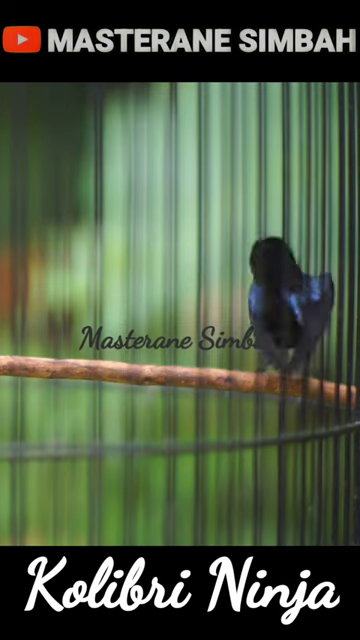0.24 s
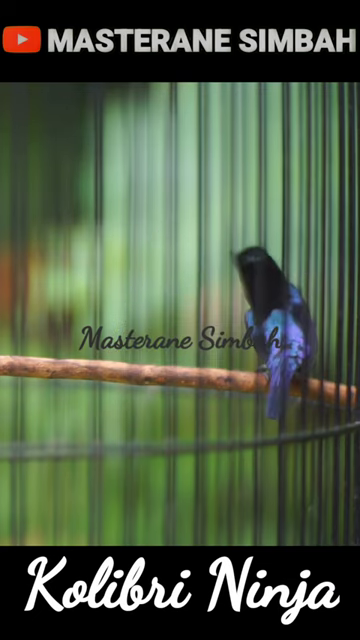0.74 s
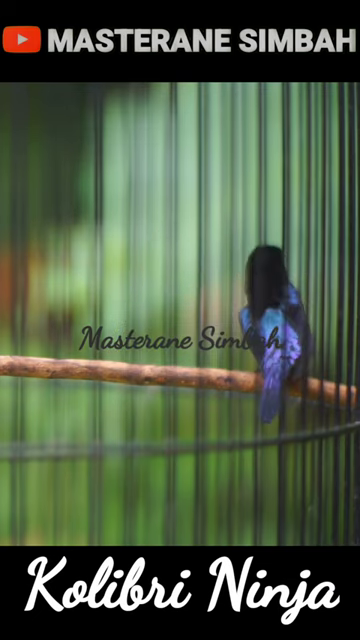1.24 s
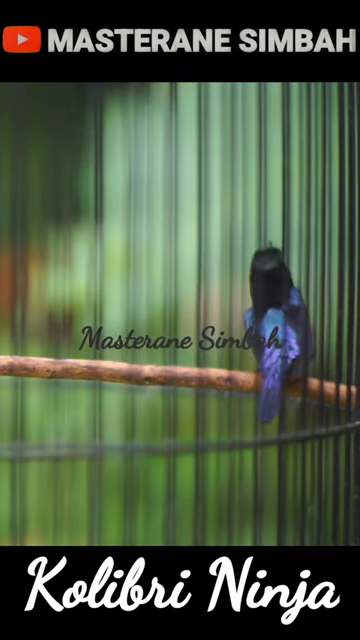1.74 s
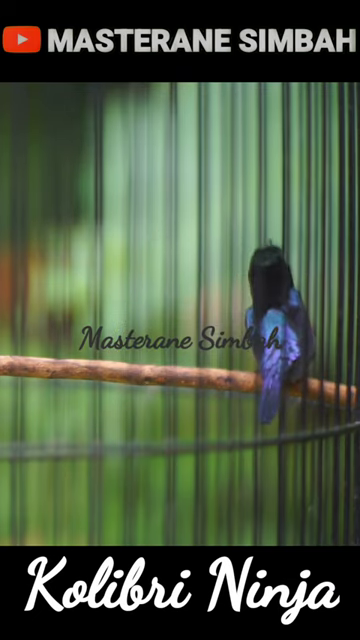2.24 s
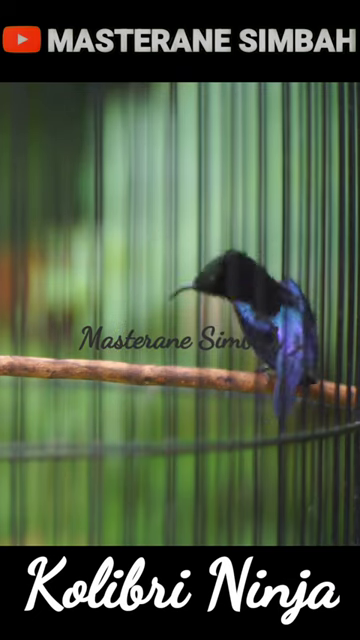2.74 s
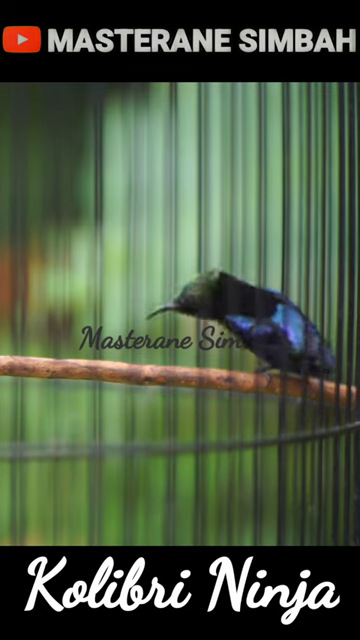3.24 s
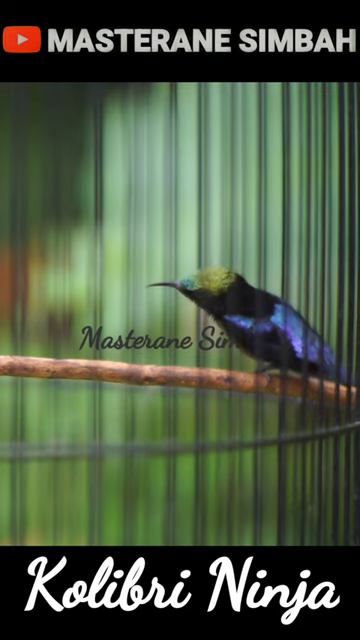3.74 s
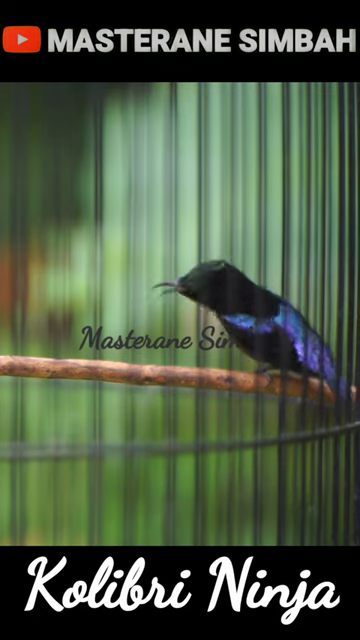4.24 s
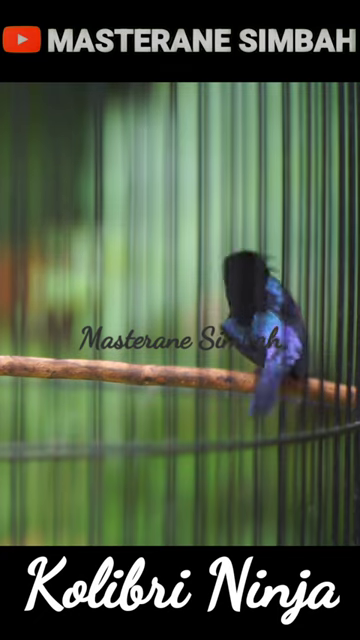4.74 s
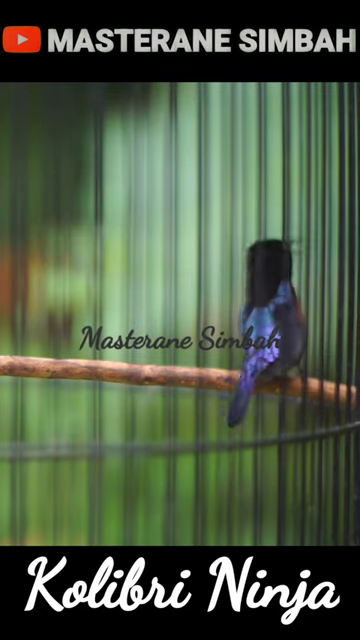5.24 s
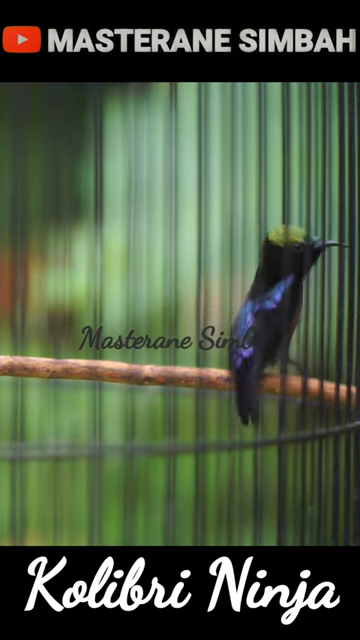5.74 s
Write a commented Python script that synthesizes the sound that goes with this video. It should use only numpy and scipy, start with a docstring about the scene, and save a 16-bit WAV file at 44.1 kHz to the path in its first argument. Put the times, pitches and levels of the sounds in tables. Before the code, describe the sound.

A small caged songbird sings close to a stereo microphone, leaning left, in a hard-surfaced space with a short bright tail. Soft hiss, barely audible hums and low rumble lie underneath. Three clipped, slightly buzzy two-toned chirps, around 5 kHz, come at 0.15, 0.4 and 0.6 s, over thin high distant birds. From about 0.75 to 2.1 s a fast trill of fifteen near-identical whistles runs at roughly eleven per second, each climbing, flicking upward and cutting off, louder than the chirps, while the hiss thickens. Single chirps return at 2.4, 3.1, 3.5, 4.1, 4.3, 4.8, 5.3 and 5.7 s. Between them are faint airy puffs near 2.6 and 3.9 s, a tiny dry tick at 3.2 s and a stronger puff at 4.35 s. Very faint far calls come near 4.6 s, and rumble swells around 5.4 s. A clearer distant whistle at 5.55 s and a dull low puff at 5.7 s accompany the last chirp.

```python
"""A small caged bird sings near a two-port microphone in a hard room, over soft hiss, hums and low rumble.
Three two-voiced chirps come first, over thin far birds; from 0.75 s to 2.1 s a fast trill of whistles
follows, with louder hiss. Then single chirps return among short noise bursts, soft puffs and one very brief
tick, with farther calls from 4.6 s and the rumble highest near 5.4 s. Gliding phases and breath noise form
the bird, wavering sines the far birds and hums, shaped noise the bursts and hiss, echoes and a tail the room."""
import sys
import numpy as np
from scipy import signal
from scipy.fft import rfft, irfft
from scipy.io import wavfile
from scipy.ndimage import uniform_filter1d

SR = 44100
rng = np.random.default_rng(int(sys.argv[2]) if len(sys.argv) > 2 else 0)


def wrap_up_sound(samples):
    """Save the sound to the file named by the first command line argument, as 16-bit audio."""
    columns = np.atleast_2d(samples).T
    # keep every value between -1 and 1, then stretch to whole-number steps
    tamed = np.clip(columns, -1, 1)
    steps = np.round(tamed * 32767).astype(np.int16)
    wavfile.write(sys.argv[1], SR, steps)


N = 263277

# Spectrum of the hiss. Each row: frequency in Hz, relative density in dB per Hz.
HISS_SPECTRUM = [(15, -91), (25, -43), (79, -15), (114, -12), (317, -8), (360, -9.5), (454, -7.5),
                 (1270, -7), (2880, -8), (5900, -7), (8670, -11.5), (10600, -9), (11500, -9),
                 (15000, -65.5), (22000, -120)]
# Overall level of the hiss, louder during the trill. Each row: time in seconds, level in dB.
HISS_LEVEL = [(0, -56), (.65, -59.5), (0.898, -55), (2.02, -58), (2.252, -64), (3.5, -61.5), (4.25, -58.5),
              (5.97, -58.5)]
# Tilt of the hiss toward low frequencies, about 300 Hz down. Each row: time in seconds, relative gain in dB.
RUMBLE_GAIN = [(0, -2.5), (1.3, -3), (2.3, 3), (3.0, 4.5), (4.6, 4), (5.4, 11.5), (5.97, -1.5)]
# Likeness of the two hiss channels. Each row: frequency in Hz, left-right correlation from -1 to 1.
HISS_CORRELATION = [(60, 0.77), (170, 0.3), (490, -0.12), (1400, -0.46), (4000, 0.073), (11400, -0.24)]
# Balance of the hiss. Each row: frequency in Hz, left over right in dB.
HISS_BALANCE = [(60, 0.5), (220, 0.87), (830, 0.4), (3080, 2.8), (11400, 8.4)]
# Faint hums. Each row: start in seconds, length in seconds, first pitch in Hz, last pitch in Hz, level in dB.
HUM_CALLS = [(0, 0.417, 840, 856, -78.5), (3.05, 0.54, 847, 786, -78), (3.76, 0.13, 124, 120, -77.5),
             (4.35, .52, 315, 311, -75), (5.02, 0.77, 316.4, 311.6, -75.5), (5.33, .15, 134, 130, -74)]
# Short noise bursts: soft puffs and one very brief broadband tick. Each row: start in seconds, level in dB,
# band centre in Hz, band width in Hz, t60 in seconds.
NOISE_BURSTS = [(2.639, -59, 2825, 2484, 0.22), (3.178, -35.5, 6950, 14000, 0.006),
                (3.93, -61.5, 2900, 3010, 0.17), (4.004, -58.5, 1440, 2000, .1),
                (4.356, -43, 3500, 2541, 0.19), (5.711, -48.5, 480, 303, 0.13)]
# Farther birds, before the room. Each row: start in seconds, length in seconds, first pitch in Hz,
# last pitch in Hz, level in dB, height of the arch in between in Hz.
FAR_CALLS = [(0, .14, 7030, 7040, -62, 0), (.29, .1, 6970, 7050, -66, 0), (4.58, .08, 6300, 6200, -74, 0),
             (4.68, .12, 5650, 5700, -73, 0), (5.552, .165, 6650, 6900, -46, 480)]
# Reverberation time. Each row: frequency in Hz, t60 in seconds.
ROOM_DECAY = [(2000, 0.064), (5000, 0.37), (7000, 0.26), (11000, 0.24)]
# Colour of the tail. Each row: frequency in Hz, relative gain in dB.
TAIL_COLOUR = [(2500, 8.5), (4000, -4), (5000, -3.5), (6000, -2), (7500, -3.5), (11000, -1.5)]
# Near surfaces. Each row: delay in seconds, left gain in dB, right gain in dB.
NEAR_ECHOES = [(.0018, -19, -17), (.0047, -16, -14), (.0093, -18, -16), (.015, -17, -17)]
# Response of the right port against the left. Each row: frequency in Hz, gain in dB.
RIGHT_PORT = [(2500, 3.5), (4000, 1.5), (5000, -.5), (8000, -2), (11000, -1.5)]
# Two-voiced chirps, before the room. Each row: pitch peak in seconds, held pitch in Hz, start of the lower
# voice in Hz (scaled slightly later), its settling time in seconds, opening level in dB, held level in dB,
# left over right in dB, end of the hold in seconds after the peak (the release starts 6 ms before it).
CHIRP_NOTES = [(0.1528, 5170, 3350, 0.0039, -20.5, -16.5, 6, 0.019),
               (0.4055, 5232, 3180, 0.0039, -18.5, -16, 8, 0.026),
               (0.606, 5177, 3123, 0.0055, -20.5, -14.5, 6.5, 0.022),
               (2.4378, 5175, 3380, 0.0023, -23, -18.5, 7, .025),
               (3.1288, 5142, 3587, 0.0032, -20.5, -17.5, 6.5, 0.02),
               (3.529, 5106, 3334, 0.0041, -20, -19, 7.5, 0.022),
               (4.1067, 5110, 3290, .0045, -20.5, -19.5, 7.5, 0.02),
               (4.331, 5152, 3436, 0.0034, -20.5, -16.5, 8.5, 0.021),
               (4.8225, 5210, 3586, 0.0038, -21.5, -16.5, 5.5, 0.028),
               (5.3092, 5260, 3383, 0.0036, -23.5, -16, 5.5, .025),
               (5.7125, 5280, 3388, 0.0092, -22, -18.5, 5.5, 0.032)]
# Trill whistles, before the room. Each row: pitch peak in seconds, held pitch in Hz,
# top of the opening climb in Hz, held level in dB.
TRILL_NOTES = [(0.7528, 5004, 4340, -12), (0.8436, 4840, 4264, -11.5), (0.9321, 4970, 4170, -12),
               (1.0264, 4890, 4220, -12.5), (1.12, 4886, 4120, -12.5), (1.2134, 4935, 4175, -12.5),
               (1.3108, 4877, 4150, -13), (1.408, 4850, 4063, -12), (1.507, 4907, 4080, -12),
               (1.6086, 4810, 4090, -12.5), (1.7098, 4782, 4046, -12.5), (1.8104, 4860, 4110, -12.5),
               (1.9176, 4897, 4100, -12.5), (2.0199, 4840, 4060, -12.5), (2.1185, 4800, 4046, -13.5)]

EDGE_HZ = 11100
TRILL_OPENING_DB, TRILL_LEAN_DB, TRILL_END_S = 0.3, 5.5, 0.019  # the same for every whistle
# Note shapes: times in seconds from the pitch peak, pitches without a unit are shares of the held pitch.
# Chirp: both voices start together, then flick up, the lower one later;
# the upper returns to the held pitch while the lower fades out above it.
CHIRP_LEAD_S, CHIRP_ATTACK_S, OVERSHOOT = .0097, .0014, .07
UPPER_FLICK, UPPER_FLICK_S, UPPER_START_DB = .39, 0.0035, -2
LOWER_TOP, LOWER_AT_S, LOWER_FLICK_S, LOWER_START_DB = 1.14, .002, .0056, -18.5
# Whistle: a slowing climb, a catch, a flick that thins the tone, then the held pitch.
CLIMB_LEAD_S, CLIMB_FROM_HZ, CLIMB_S, CLIMB_SWELL_S, CLIMB_DB = .029, 2450, .0062, .0053, -6.5
KNEE_HZ, CREST_AT_S, CREST_S, CREST_DB = 3853, -.011, 0.0025, 4.5
CATCH_AT_S, CATCH_S, CATCH_DROP, CATCH_DB = -.0073, .0012, .07, -14
FLICK, FLICK_S, FLICK_DB, THIN_S = 0.32, 0.0037, -11.5, 0.004
SAG_PER_S, SAG_DB_PER_S = 0.85, 248.5  # fall of the held part in pitch and level


def amp(db):
    """Logarithmic level: decibels become an amplitude ratio."""
    return 10 ** (np.asarray(db) / 20)


def evened(x):
    """Power normalisation: scales to rms 1."""
    return x / np.sqrt(np.mean(x ** 2) + 1e-20)


def read(points, hz):
    """Logarithmic frequency scale: interpolates a spectrum between its points."""
    f, value = np.transpose(points)
    return np.interp(np.log(hz + 1), np.log(f + 1), value)


def add(mix, s, sound):
    """Superposition: adds a sound to the mix from time s."""
    part = mix[..., round(s * SR):][..., :sound.shape[-1]]
    part += sound[..., :part.shape[-1]]


def wander(size, smooth):
    """Low-passed random fluctuation: white noise averaged twice, at rms 1."""
    once = uniform_filter1d(rng.standard_normal(size), smooth)
    return evened(uniform_filter1d(once, smooth))


def bump(t, at, width, order=2):
    """Gaussian-like pulse of height 1; a higher order flattens its top."""
    return np.exp(-abs((t - at) / width) ** order)


def hiss():
    """Partly coherent random noise: soft background hiss from random short-time spectra with drifting patches."""
    frames, hz = N // 256 + 5, np.fft.rfftfreq(1024, 1 / SR)
    a, b, c, d, patches = rng.standard_normal((frames, 513, 5)).T
    patches = uniform_filter1d(patches, size=12, axis=0)  # over frequency
    patches_db = 1.6 * evened(uniform_filter1d(patches, size=16, axis=1))  # over time
    # the right channel shares a set part of the left one
    same = np.clip(read(HISS_CORRELATION, hz), -1, 1)[:, None]
    left = a + 1j * b
    right = same * left + np.sqrt(1 - same ** 2) * (c + 1j * d)
    rumble_at_frame = np.interp(np.arange(frames) * 256 / SR, *np.transpose(RUMBLE_GAIN))
    rumble_db = np.outer(1 / (1 + (hz / 300) ** 2), rumble_at_frame)
    lean_db = np.multiply.outer([.5, -.5], read(HISS_BALANCE, hz))
    colour_db = (read(HISS_SPECTRUM, hz) + lean_db)[..., None]
    spectra = np.array([left, right]) * amp(colour_db + rumble_db + patches_db)
    noise = evened(signal.istft(spectra, nperseg=1024, noverlap=768)[1][:, :N])
    return amp(np.interp(np.arange(N) / SR, *np.transpose(HISS_LEVEL))) * noise


def tones(calls, wobble, flutter_db, smooth, fade):
    """Frequency modulation: soft sines glide from a first to a last pitch and waver."""
    out = np.zeros(N)
    for s, length, first_hz, last_hz, db, *arch_hz in calls:
        u = np.linspace(0, 1, round(length * SR))
        glide = first_hz + (last_hz - first_hz) * u + sum(arch_hz) * np.sin(np.pi * u ** .7)
        pitch = glide * (1 + wobble * wander(len(u), smooth))
        edges = signal.windows.tukey(len(u), min(fade, 1))
        level = np.sqrt(2) * amp(db + flutter_db * wander(len(u), smooth)) * edges
        add(out, max(s, 0), level * np.sin(2 * np.pi * np.cumsum(pitch) / SR))
    return out


def hums():
    """Quasi-steady tones: faint hums with slow wavering, equal in both channels."""
    return tones(HUM_CALLS, wobble=.012, flutter_db=4, smooth=700, fade=.4)


def noise_bursts():
    """Exponential decay of band-limited noise: grainy soft puffs and one very brief broadband tick."""
    out, t = np.zeros((2, N)), np.arange(SR // 4) / SR
    hz = np.fft.rfftfreq(len(t), 1 / SR)
    for s, db, centre, width, t60 in NOISE_BURSTS:
        grains = rng.standard_normal((2, len(t))) * amp(0.72 * wander(len(t), smooth=30))
        band = 1 / (1 + ((hz - centre) / width * 2) ** 4)
        burst = evened(irfft(rfft(grains) * band, len(t)))
        decay = amp(db - 60 * t / t60)
        onset = np.minimum(t / (0.023 * t60), 1)
        add(out, s, decay * onset * burst * amp([[2.5], [-2.5]]))
    return out


def far_birds():
    """Gliding pure tones: farther birds as wavering whistles, stronger at the left."""
    calls = tones(FAR_CALLS, wobble=0.0043, flutter_db=2.0, smooth=150, fade=0.53)
    return calls * amp([[1.5], [-1.5]])


def room(x, tail_db=-9.0):
    """Early reflection and reverberation: near echoes, then sparse taps that build up and die by band."""
    out, t, lean_db, build_s = x.copy(), np.arange(N) / SR, 4.0, .013
    for s, left_db, right_db in NEAR_ECHOES:
        add(out, s, x * amp([[left_db], [right_db]]))
    # three random tails are blended in a steady 1.5 Hz rotation
    for k in range(3):
        taps = np.zeros((2, SR // 2))
        grid = np.arange(200, SR // 2 - 20, 20)
        at = grid + rng.integers(0, 20, (2, len(grid)))
        np.put_along_axis(taps, at, rng.choice([-1., 1.], at.shape), 1)
        hz, age, z = signal.stft(taps, SR, nperseg=128)
        decay_db = -60 * age / read(ROOM_DECAY, hz)[:, None]
        shape = amp(read(TAIL_COLOUR, hz)[:, None] + decay_db) * np.minimum(age / build_s, 1)
        tail = signal.istft(z * shape, SR, nperseg=128)[1]
        tail = tail / np.linalg.norm(tail[0])
        turn = np.sqrt(2 / 3) * np.cos(2 * np.pi * (1.5 * t + k / 3))
        wet = signal.fftconvolve((x.mean(0) * turn)[None], tail, axes=1)[:, :N]
        out += amp([[tail_db], [tail_db - lean_db]]) * wet
    return out


def ports(x, lag=1.0):
    """Interchannel delay and shading: the left port lags (in samples), the right one is weaker in the treble."""
    hz = np.fft.rfftfreq(N, 1 / SR)
    delay = np.exp(-2j * np.pi * lag * hz / SR)
    return irfft(rfft(x) * np.array([delay, amp(read(RIGHT_PORT, hz))]), N)


def voice(pitch, db):
    """Self-sustained oscillation: one side of the syrinx as level and turning phase, never quite steady."""
    unsteady, flutter_db = .006, 1.5  # share of the pitch, dB
    pitch = uniform_filter1d(pitch, size=30) * (1 + unsteady * wander(len(pitch), smooth=40))
    level = amp(db + flutter_db * wander(len(pitch), smooth=60))
    return level, np.exp(2j * np.pi * (np.cumsum(pitch) / SR + rng.random()))


def swell(t, opening_db, held_db, end, turn, fade_db=2200):
    """Breath effort as amplitude envelope: from the opening level to the held one, then a fall in dB per s."""
    level_db = np.interp(t, [turn - .003, turn + .003], [opening_db, held_db])
    return np.sqrt(2) * amp(level_db - fade_db * np.maximum(t - end + .006, 0))


def breath(level, db):
    """Turbulence noise: air noise rides on the note, thin in the bass and rising to the treble."""
    thin = signal.butter(2, 900, "high", fs=SR, output="sos")
    noise = signal.lfilter([1, -.6], 1, rng.standard_normal(len(level)))
    return amp(db) * signal.sosfilt(thin, level * noise)


def chirp(hz, lower_hz, settle, opening_db, held_db, end):
    """Nonlinear coupling: two voices share one airway and so yield sum and difference tones."""
    t = np.arange(-.012, .04, 1 / SR)
    age = t + CHIRP_LEAD_S * (1 + .03 * rng.standard_normal())
    attack_db = np.where(age > 0, -24 * np.maximum(1 - age / CHIRP_ATTACK_S, 0), -200)
    overshoot = OVERSHOOT * bump(age, .001, .0028)

    flick = UPPER_FLICK * bump(t, 0, UPPER_FLICK_S, order=3) + overshoot
    upper_pitch = hz * (1 + flick - SAG_PER_S * np.maximum(t - .008, 0))
    soft_db = UPPER_START_DB * np.interp(t, [-.006, -.003, .005], [1, .4, 0])
    sag_db = SAG_DB_PER_S * np.maximum(t - .009, 0)
    upper, a = voice(upper_pitch, attack_db + soft_db - sag_db)

    # the lower voice rises from its start, then moves toward 1.2 times the held pitch as it fades
    rising = t < LOWER_AT_S
    width, order = np.where(rising, LOWER_FLICK_S, settle), np.where(rising, 3, 2)
    rise = bump(t, LOWER_AT_S, width, order)
    foot = np.where(rising, lower_hz * (.95 + overshoot), 1.2 * hz)
    lower_pitch = foot + (LOWER_TOP * hz - foot) * rise
    start_db = LOWER_START_DB * (1 - rise ** 2) * rising
    stop_db = -14 * (np.maximum(t - LOWER_AT_S, 0) / settle) ** 3
    lower, b = voice(lower_pitch, attack_db + start_db + stop_db)
    lower = lower * amp(rng.uniform(-1.4, 1.0))

    # the folds couple most before the glide
    buzz = np.interp(t, [-.0065, -.004], [1, .04])
    sum_tone = amp(10.5) * np.sqrt(buzz) * a * b
    lower_octave = buzz * amp(8) * buzz * b * b
    difference_tone = buzz * amp(-9) * (buzz - .04) * a / b
    mixed = sum_tone + lower_octave + difference_tone
    tone = upper * (a + amp(-21.5) * a * a) + lower * b + upper * lower * mixed
    return (tone.real + breath(upper, db=-26.5)) * swell(t, opening_db, held_db, end, turn=0.0035)


def whistle(hz, climb_hz, db):
    """Harmonic series: one voice with weak overtones, stronger early, while the pitch is still low."""
    t = np.arange(-.034, .04, 1 / SR)
    age = np.maximum(t + CLIMB_LEAD_S * (1 + 0.014 * rng.standard_normal()), 0)
    slowing = KNEE_HZ - (KNEE_HZ - CLIMB_FROM_HZ) * np.exp(-age / CLIMB_S)
    climb = slowing + (climb_hz - KNEE_HZ) * np.minimum(age / 0.01767, 1)
    opened = np.clip((t - CATCH_AT_S - .0015) / .003, 0, 1)
    catch = bump(t, CATCH_AT_S, CATCH_S)
    sag_s = np.maximum(t - .008, 0)
    held = 1 - SAG_PER_S * sag_s
    flick = FLICK * bump(t, 0, FLICK_S)
    pitch = (1 - opened) * climb + hz * (opened * held + flick - CATCH_DROP * catch)

    climb_db = CLIMB_DB * np.clip((CATCH_AT_S - t) / CATCH_S, 0, 1)
    climb_db = climb_db - 38 * np.exp(-age / CLIMB_SWELL_S) + CREST_DB * bump(t, CREST_AT_S, CREST_S)
    thin_db = FLICK_DB * bump(t, 0.00017, THIN_S, order=4)
    level, a = voice(pitch, climb_db + CATCH_DB * catch + thin_db - SAG_DB_PER_S * sag_s)
    level = level * (age > 0)

    flick_loss_db = 9 * bump(t, -.002, .0045)
    low_db = np.interp(t, [-.028, -.016], [25.0, 2.5]) - flick_loss_db
    second_db, third_db, fourth_db = np.array([-29, -35, -46]) + 2.5 * rng.standard_normal(3)
    overtones = amp(second_db) * a * a + amp(third_db) * a ** 3 + amp(fourth_db) * a ** 4
    tone = a + amp(low_db) * overtones
    effort = swell(t, db + TRILL_OPENING_DB, db, TRILL_END_S, turn=.002)
    return (level * tone.real + breath(level, db=-29.5)) * effort


def bird():
    """Interchannel level difference: every note is placed in time and weakened at the right port."""
    out = np.zeros((2, N + SR))
    for s, *note, lean_db, end in CHIRP_NOTES:
        add(out, s - .012, chirp(*note, end) * amp([[0], [-lean_db]]))
    for s, *note in TRILL_NOTES:
        add(out, s - .034, whistle(*note) * amp([[0], [-TRILL_LEAN_DB]]))
    return out[:, :N]


def scene():
    """Superposition: bird and neighbours in the room, over noise bursts, hums and hiss."""
    return ports(room(bird() + far_birds())) + noise_bursts() + hums() + hiss()


def record(dry):
    """Band limitation: the recorder's low-pass edge."""
    edge = signal.firwin(281, EDGE_HZ, window=("kaiser", 7), fs=SR)
    return signal.oaconvolve(dry, edge[None], "same")


dry = scene()
out = record(dry)
wrap_up_sound(out)
```